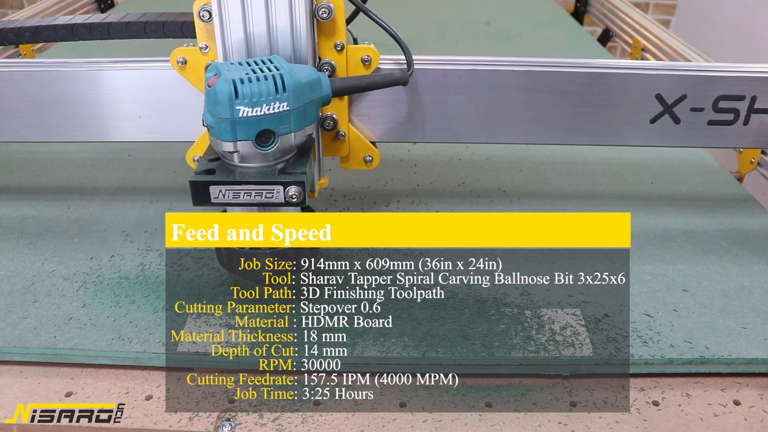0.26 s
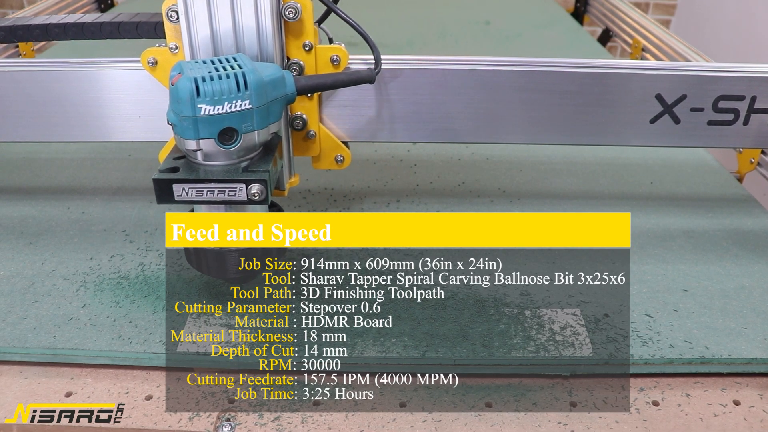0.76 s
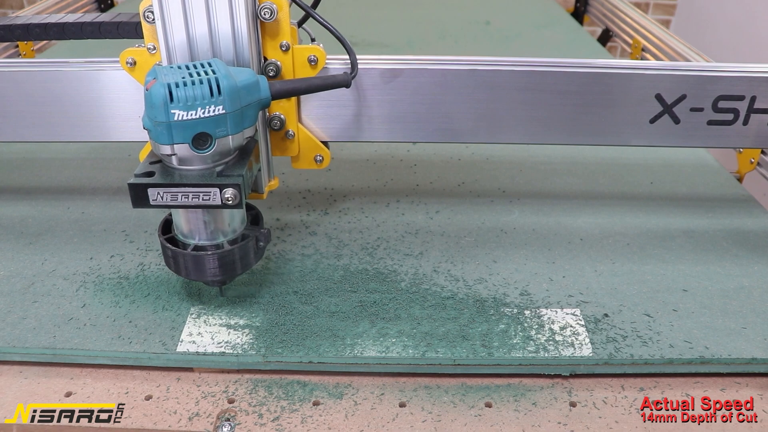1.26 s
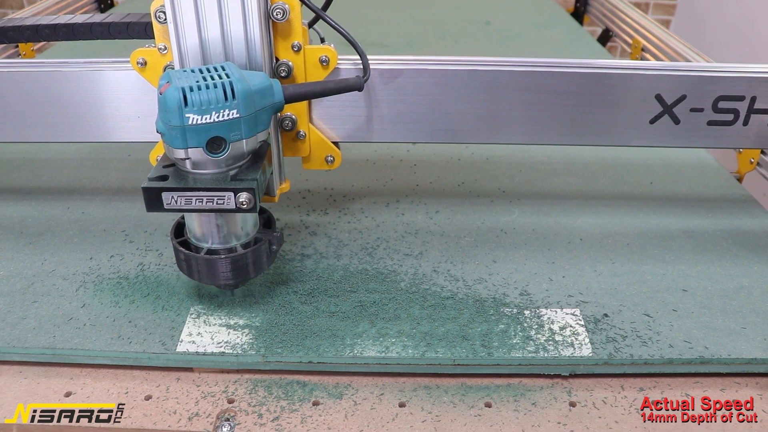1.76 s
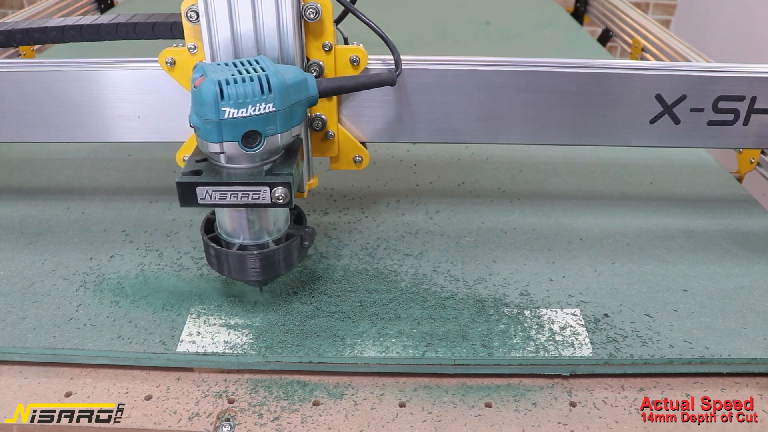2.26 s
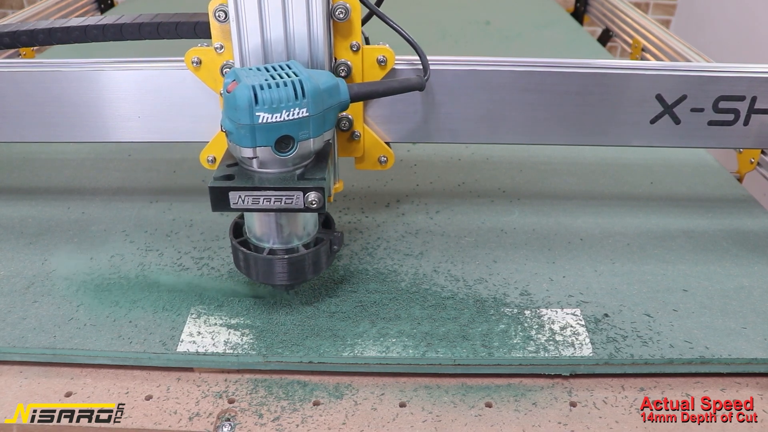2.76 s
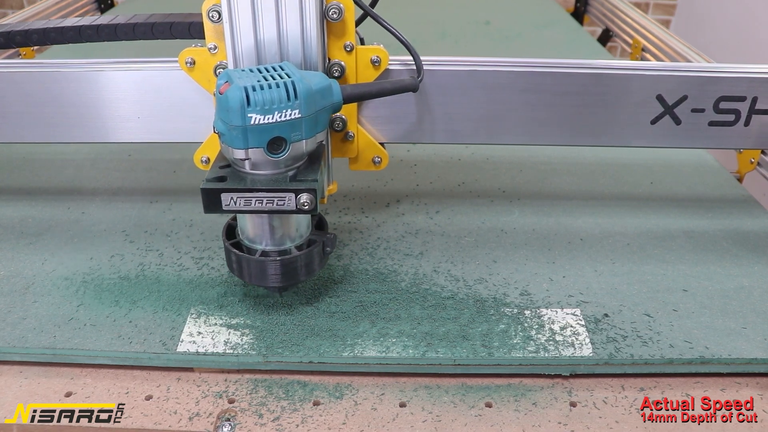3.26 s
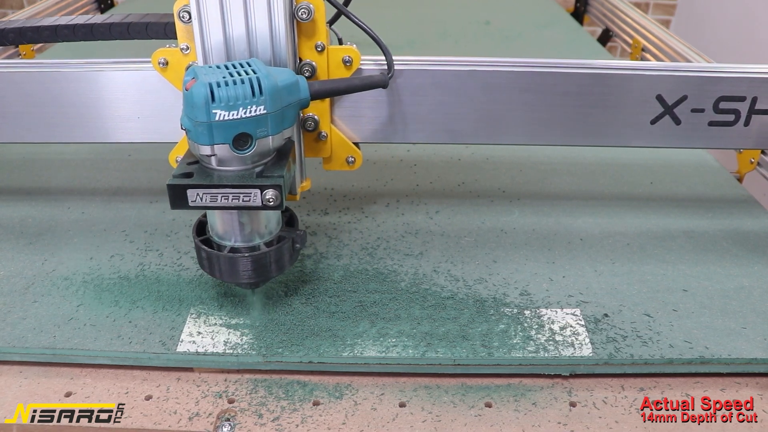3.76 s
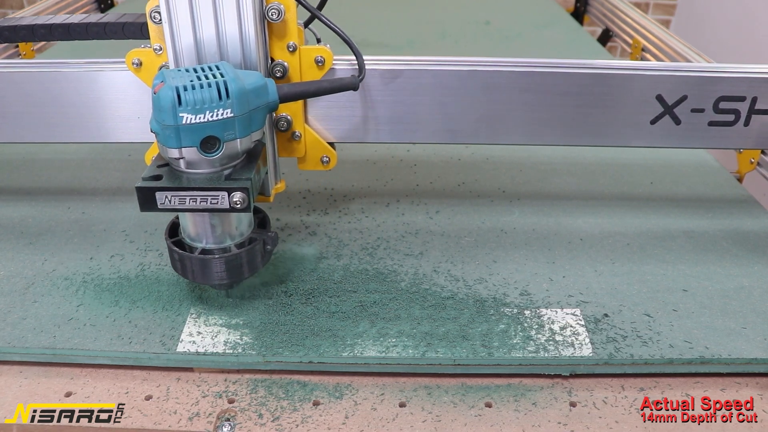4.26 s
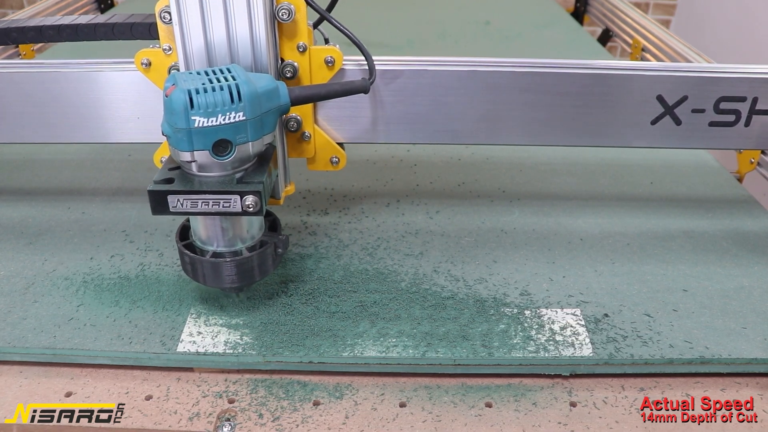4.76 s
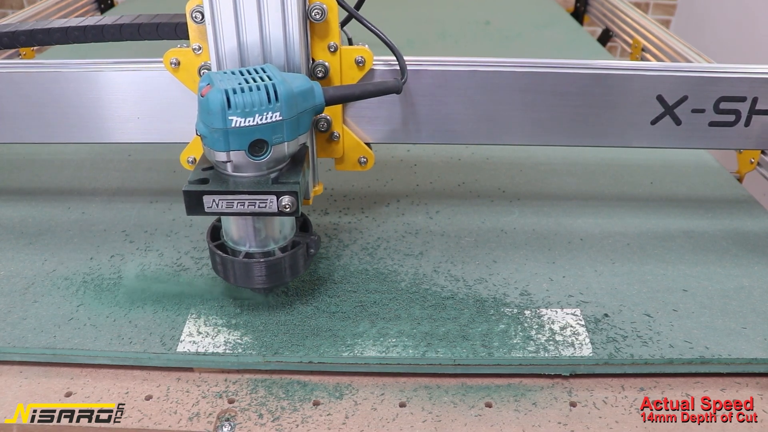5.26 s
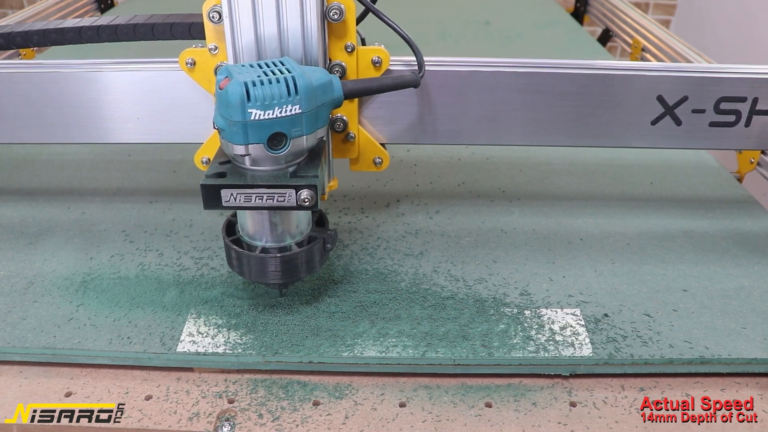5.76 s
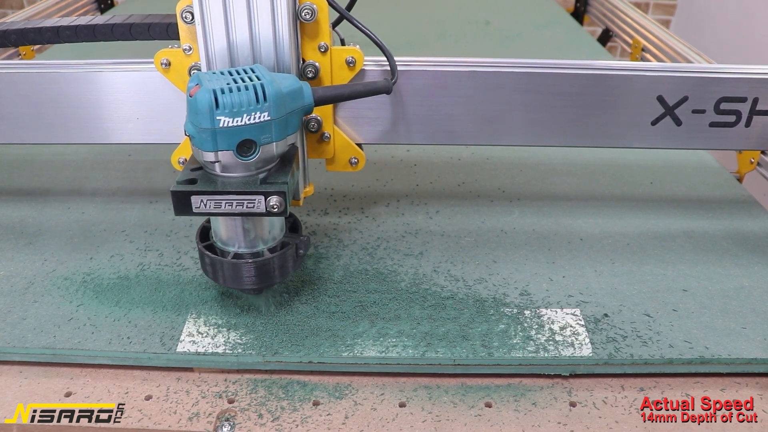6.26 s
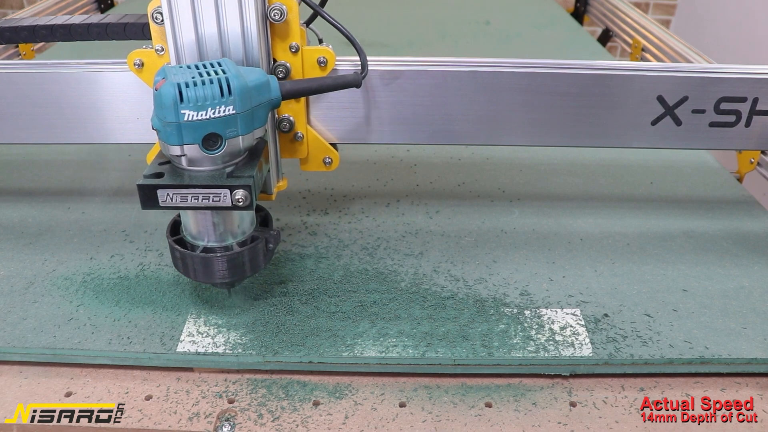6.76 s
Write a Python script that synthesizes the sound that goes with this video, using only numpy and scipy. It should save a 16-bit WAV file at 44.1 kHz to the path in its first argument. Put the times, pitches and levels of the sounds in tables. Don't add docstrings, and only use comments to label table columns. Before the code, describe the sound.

Continuous electric router whine with a slightly sagging and recovering pitch, airy motor roar and fine dusty hiss as a bit carves board in a workshop.

```python
import sys
import numpy as np
from scipy import signal
from scipy.fft import rfft, irfft, next_fast_len
from scipy.io import wavfile

SR = 44100
rng = np.random.default_rng(int(sys.argv[2]) if len(sys.argv) > 2 else 0)


def attenuation_scalar(level_db):
    decades = np.asarray(level_db, float) / 20
    return 10 ** decades


def persist_wave(psi):
    counts = np.round(np.clip(psi, -1, 1) * 32767).astype(np.int16)
    wavfile.write(sys.argv[1], SR, np.atleast_2d(counts).T)


N = 309141

# frequency in Hz, phase lead of the left in radians.
PORT_LEAD = [(600, 0), (1550, 0.86), (2500, 0.78), (4000, 1.5), (6000, 2.0), (9000, 3.5), (12000, 4.5),
             (15200, 4)]


def rms_one(x):
    return x / np.sqrt(np.mean(np.abs(x) ** 2) + 1e-20)


def in_time(rows):
    s, *columns = np.transpose(rows)
    return [np.interp(np.arange(N) / SR, s, c) for c in columns]


def at_hz(points, hz):
    point_hz, value = np.transpose(points)
    return np.interp(np.log(hz + 1e-9), np.log(point_hz), value)


def humps(rows):
    t = np.arange(0, N + 40, 40) / SR
    total = sum(height * .5 ** ((2 * (t - s) / length) ** 2) for s, length, height in rows)
    return np.interp(np.arange(N) / SR, t, total)


def drift(rate_hz):
    pole = np.exp(-80 * np.pi * rate_hz / SR)
    noise = rng.standard_normal(N // 40 + 2002)
    slow = signal.lfilter([1], [1, -2 * pole, pole * pole], noise)[2000:]
    return np.interp(np.arange(N) / 40, np.arange(len(slow)), rms_one(slow))


def fading(rate_hz):
    return (drift(rate_hz) + 1j * drift(rate_hz)) / np.sqrt(2)


def port_noise(spectrum):
    # frequency in Hz, direct share of the power.
    likeness = [(30, .995), (90, .99), (150, .97), (400, .93), (700, .72), (1200, .6), (2500, .55),
                (6000, .5), (15000, .58)]
    # frequency in Hz, left minus right in dB.
    balance = [(60, -1), (110, -2.5), (200, 7), (380, -2.5), (700, 2.5), (1290, 2.5), (2380, -3.5),
               (4400, 2.5), (8120, 3), (15000, -5)]
    size = next_fast_len(N)
    hz = np.arange(size // 2 + 1) * SR / size
    direct, left, right = rfft(rng.standard_normal((3, size)))
    alike = np.clip(at_hz(likeness, hz), 0, 1)
    late = np.exp(-1j * at_hz(PORT_LEAD, hz))
    direct_pair = np.sqrt(alike) * direct * np.array([late ** 0, late])
    room_pair = np.sqrt(1 - alike) * np.array([left, right])
    pan = attenuation_scalar(at_hz(balance, hz) * np.array([[.5], [-.5]]))
    coloured = (direct_pair + room_pair) * pan * attenuation_scalar(at_hz(spectrum, hz))
    return rms_one(irfft(coloured, size)[:, :N])


def line_heights():
    # multiple of the turning rate, level in dB.
    steady = [(1, -47), (2, -48), (3, -41.5), (4, -53.5), (5, -54.5), (6, -55.5), (7, -61.5), (8, -59),
              (12, -61)]
    # centre in seconds, multiple, length in seconds, rise in dB.
    swells = [(0.81, 2, 0.29, 2), (1.206, 1, 0.07, 4.0), (1.237, 3, 0.038, 20.5), (1.398, 2, 0.08, 4.5),
              (1.5, 3, 0.088, 4), (2.3, 3, 0.26, 2.5), (2.59, 2, 0.27, 7), (2.649, 1, 0.36, 3.0),
              (3.036, 3, 0.058, 2), (3.198, 2, 0.14, 8.5), (3.95, 2, 0.059, 5.5), (4.109, 3, 0.12, 7),
              (4.27, 3, 0.094, 11.5), (4.302, 2, 0.26, 13.5), (4.547, 3, 0.22, 13.0), (4.938, 2, 0.094, 3),
              (5.36, 2, 0.29, 10), (5.39, 1, 0.33, 4.0), (5.736, 3, 0.11, 6), (5.92, 2, 0.23, 5),
              (5.95, 3, 0.1, 5), (6.116, 3, 0.079, 11.5), (6.69, 1, 0.16, 3.5), (6.752, 2, 0.14, 10)]
    # centre in seconds, multiple, length in seconds, change in dB.
    fades = [(0, 2, 0.14, -3), (0.03, 3, 0.61, -3), (0.04, 1, 0.09, -9.5), (0.307, 2, 0.039, -13),
             (0.68, 1, 0.51, -6.5), (0.805, 3, 0.19, -14.0), (1.05, 3, 0.06, -11.0),
             (1.246, 3, 0.16, -24.5), (1.462, 1, 0.095, -7), (1.66, 3, 0.54, -3.5), (1.672, 2, 0.042, -24),
             (2.06, 3, 0.051, -5), (2.523, 3, 0.35, -6), (2.87, 2, 0.12, -11.5), (3.323, 2, 0.22, -7),
             (3.34, 1, 1, -3.5), (3.403, 3, 0.11, -4.5), (4.24, 3, 0.74, -17.5), (4.268, 2, 0.2, -17),
             (4.54, 1, 0.09, -9), (4.771, 3, 0.035, -12), (4.79, 2, 0.061, -17), (5.21, 3, 0.11, -6),
             (5.472, 2, 0.29, -14), (6.125, 2, 0.047, -18), (6.312, 1, 0.29, -10.5), (6.31, 3, 1, -6.5),
             (6.552, 2, 0.49, -10), (6.712, 3, 0.14, -9.5), (6.871, 1, 0.045, -18)]
    # centre in seconds, multiple, length in seconds, rise in dB.
    glints = [(0.19, 7, 0.41, 8), (0.24, 8, 0.34, 7.0), (0.365, 12, 0.32, 7.0), (0.39, 4, 0.45, 9.5),
              (0.69, 8, 0.32, 8), (0.82, 5, 0.085, 9), (0.995, 4, 0.48, 7), (1.467, 5, 0.63, 6.0),
              (1.5, 6, 0.08, 6), (1.73, 8, 0.21, 8.5), (2.22, 4, 0.12, 5.5), (2.331, 6, 0.26, 5.5),
              (2.95, 5, 0.23, 10), (3.06, 12, 0.11, 9), (3.184, 8, 0.23, 9), (3.31, 4, 0.12, 10.5),
              (3.61, 7, 0.4, 10.5), (3.626, 6, 0.4, 8.5), (3.67, 4, 0.22, 4), (4.0, 8, 0.23, 6),
              (4.199, 4, 0.35, 5.5), (4.239, 5, 0.76, 4.5), (4.716, 5, 0.12, 5.5), (5.27, 6, 0.31, 6.0),
              (5.68, 5, 0.28, 7.5), (5.998, 8, 0.42, 9), (6.25, 12, 0.48, 6.0), (6.279, 4, 0.27, 4),
              (6.421, 7, 0.68, 7.0), (6.771, 5, 0.58, 6.0)]
    heights = {}
    for k, level_db in steady:
        events = [(s, length, db) for s, line, length, db in swells + fades + glints if line == k]
        wander_share = min(.08 * k, .35)
        heights[k] = attenuation_scalar(level_db + humps(events)) * (1 + wander_share * fading(3.5))
    return heights


def spindle(turn):
    # multiple of the turning rate, relative level in dB.
    overtones = [(1, -5.5), (2, 0), (3, -5.5), (4, -7), (5, -5.5), (6, -6), (7, -12), (8, -6.5), (9, -27),
                 (10, -14), (11, -16.5), (12, -9), (13, -17), (14, -18), (15, -23), (16, -24.5), (17, -22),
                 (18, -25.5), (19, -30.5)]
    # frequency in Hz, side minus mid in dB.
    line_side = [(60, -18), (110, -22), (200, -17), (380, -12.5), (700, -6.5), (1290, -4.5), (2380, 4.5),
                 (4400, -1.5), (8120, -11), (15000, -9)]
    followed = line_heights()
    out = np.zeros((2, N))
    for k, level_db in overtones:
        line_hz = k * 490
        mean = attenuation_scalar(-46 + level_db)
        rate_hz = 2.4 + 0.045 * k ** 2
        flutter = 1 + min(.022 * k ** 2, .4) * fading(8.0 + 3.0 * k)
        mid = followed[k] * flutter if k in followed else mean * fading(rate_hz)
        side = mean * attenuation_scalar(at_hz(line_side, line_hz) - 3) * fading(rate_hz + 0.88)
        lead = np.clip(at_hz(PORT_LEAD, line_hz), 0, 2.0)
        side = side + mid * (0.083 / k + .6j * np.tan(lead / 2))
        wave = np.sqrt(2) * np.exp(1j * (k * turn + rng.uniform(0, 2 * np.pi)))
        out += np.real(np.array([mid + side, mid - side]) * wave)
    return out


def air(turn, level_db):
    # frequency in Hz, level in dB per Hz.
    air_spectrum = [(25, -42), (120, -39), (240, -25.5), (400, -19.5), (600, -12), (900, -0.5),
                    (1250, -4.5), (2000, 2.5), (3000, -1), (4500, -2), (7000, -9.5), (12000, -21),
                    (15000, -25.5)]
    throb = 1 + .06 * np.cos(turn)
    return attenuation_scalar(level_db + .5 * drift(7.1)) * throb * port_noise(air_spectrum)


def cutting(turn, hiss_db, dust_db):
    # frequency in Hz, level in dB per Hz.
    hiss_spectrum = [(1000, -33.5), (3000, -11.5), (5000, -4.5), (6500, 1), (8000, -2), (10000, -7.5),
                     (12000, -19.5), (14000, -32)]
    # frequency in Hz, level in dB per Hz.
    dust_spectrum = [(9000, -20), (11500, -5), (13000, 3), (15600, -6), (17000, -10)]
    mains_torque = 0.12 * np.cos(2 * np.pi * 100 * np.arange(N) / SR)
    throb = 1 + .04 * np.cos(turn) + mains_torque
    hiss = attenuation_scalar(hiss_db) * port_noise(hiss_spectrum)
    dust = attenuation_scalar(dust_db) * port_noise(dust_spectrum)
    return attenuation_scalar(1.2 * drift(44)) * throb * (hiss + dust)


def frame():
    # frequency in Hz, level in dB per Hz.
    frame_spectrum = [(25, -18), (60, -16), (110, 2), (135, -1), (150, -9), (180, 7), (230, -35),
                      (350, -23)]
    # centre in seconds, length in seconds, rise over rest in dB.
    jolts = [(0.09, 0.18, 11), (.88, 0.073, 3), (1.4, 0.53, 4), (1.8, 0.23, 6), (2.4, 0.72, 3),
             (3.01, 0.14, 11), (3.5, .2, 3), (4.5, .5, 2), (4.82, .12, 15), (5.779, .2, 6), (6.68, .12, 10),
             (6.92, 0.075, 9)]
    level_db = -84.5 + humps(jolts) + 1.5 * drift(5)
    return attenuation_scalar(level_db) * port_noise(frame_spectrum)


def axis_motor():
    # start in seconds, end in seconds, frequency in Hz, level in dB.
    travel = [
        (.7, 2.75, 245.6, -79),
        (2.8, 3.8, 166.4, -86),
        (3.899, 5.506, 246, -78),
        (5.5, 6.301, 178, -84),
        (1.102, 1.9, 112.7, -83.5),
        (4.404, 5.0, 128.5, -81),
    ]
    t, out = np.arange(N) / SR, np.zeros(N)
    for start, end, hz, level_db in travel:
        on = np.clip(np.minimum(t - start, end - t) / 0.034, 0, 1)
        angle = 2 * np.pi * np.cumsum(hz * (1 + 0.0081 * drift(2.96))) / SR
        out += on * attenuation_scalar(level_db + 2.2 * drift(5)) * np.sin(angle)
    return out


def scene():
    # time in seconds, turning rate in Hz.
    speed = [(0.0, 481.4), (0.3, 495.2), (1.16, 487), (1.33, 498.4), (1.75, 490), (2.15, 491.6),
             (2.66, 489.2), (2.92, 497.4), (3.4, 484), (3.76, 494.5), (4.2, 486), (4.4, 501), (4.7, 492),
             (5.05, 489.8), (5.63, 497.1), (6.28, 483.1), (6.74, 500.4), (7.01, 493.7)]
    # centre in seconds, length in seconds, change of speed
    # in Hz.
    speed_bends = [(1.18, .1, -1.25), (1.61, .06, -1.83), (1.91, 0.15, -1.35), (3.08, .15, -1.1),
                   (3.26, 0.11, 2.05), (4.82, 0.074, 3), (5.37, 0.16, -1.5), (5.78, 0.138, -2.0), (6.03, 0.2, 3),
                   (6.61, 0.074, -1.7), (6.88, 0.074, -2.1)]
    # time in seconds, level in dB.
    chips = [(0.0, -52.5), (0.64, -53), (0.74, -51), (0.86, -53.5), (0.9, -52.5), (1.03, -55), (1.46, -54),
             (1.5, -58.5), (2.03, -51), (2.58, -54.5), (3.34, -54.5), (3.82, -51.5), (4.74, -58),
             (4.86, -53.5), (6.13, -55), (6.46, -50), (6.56, -52), (7.01, -55.5)]
    # centre in seconds, length in seconds, change in dB.
    shaded = [
        (.15, .6, -5),
        (3.0, .9, -9),
        (5.85, .7, -7),
    ]
    speed_hz, = in_time(speed)
    turn = 2 * np.pi * np.cumsum(speed_hz + humps(speed_bends) + .3 * drift(7)) / SR
    chips_db, = in_time(chips)
    swing_db = chips_db - chips_db.mean()
    air_db = -42 + 0.27 * swing_db
    hiss_db = -49 + 1.53 * swing_db
    dust_db = -64 + 1.4 * swing_db + humps(shaded)
    return spindle(turn) + air(turn, air_db) + cutting(turn, hiss_db, dust_db) + frame() + axis_motor()


def band_limit(x):
    return signal.sosfilt(signal.butter(12, 15700, fs=SR, output="sos"), x)


def record(dry):
    return band_limit(dry)


dry = scene()
out = record(dry)
persist_wave(out)
```